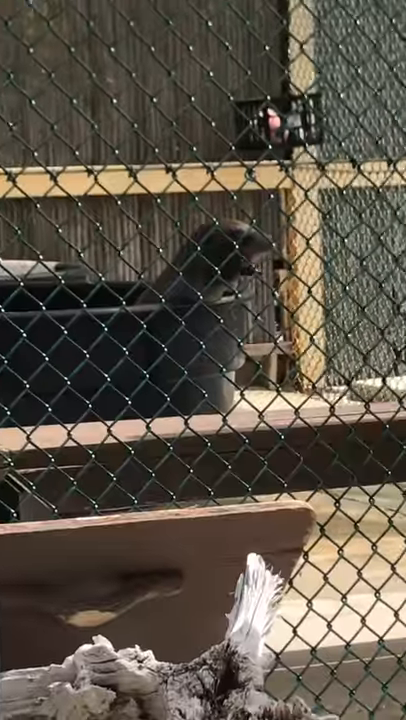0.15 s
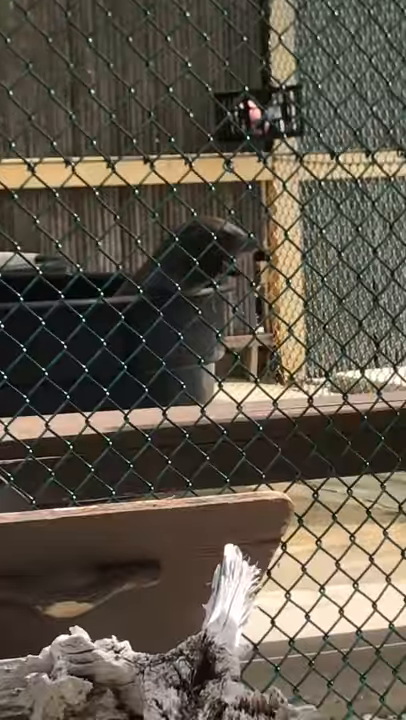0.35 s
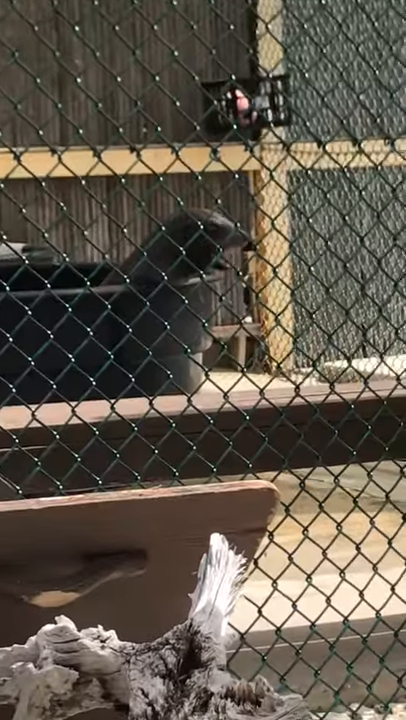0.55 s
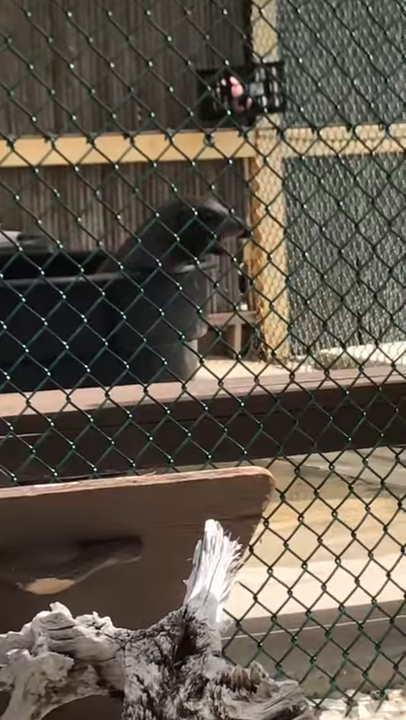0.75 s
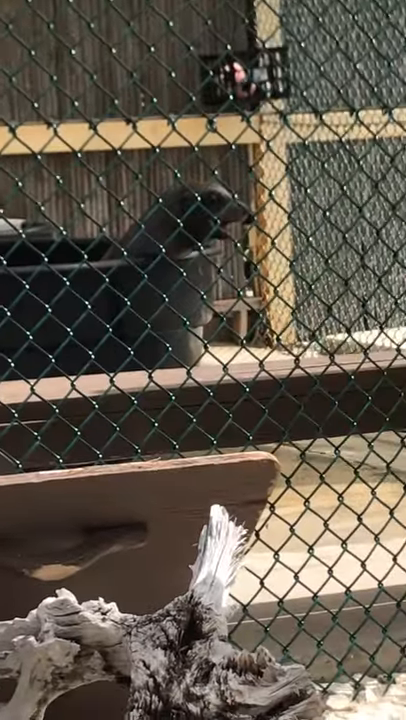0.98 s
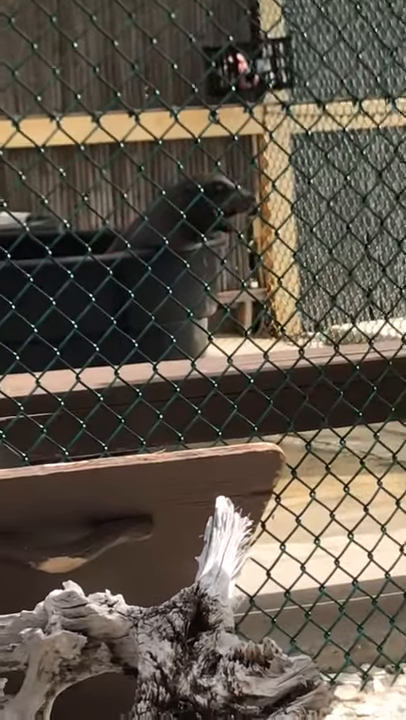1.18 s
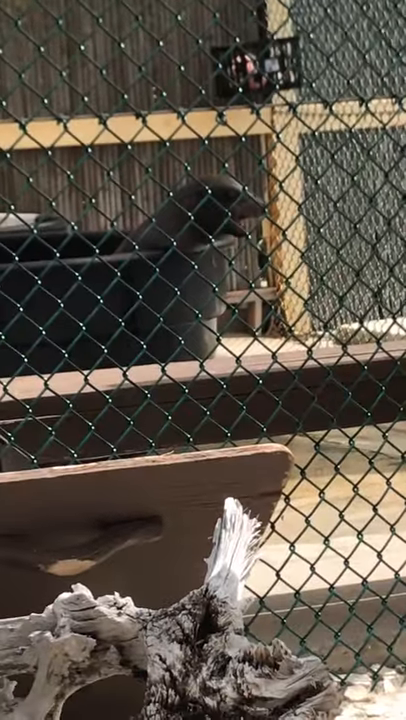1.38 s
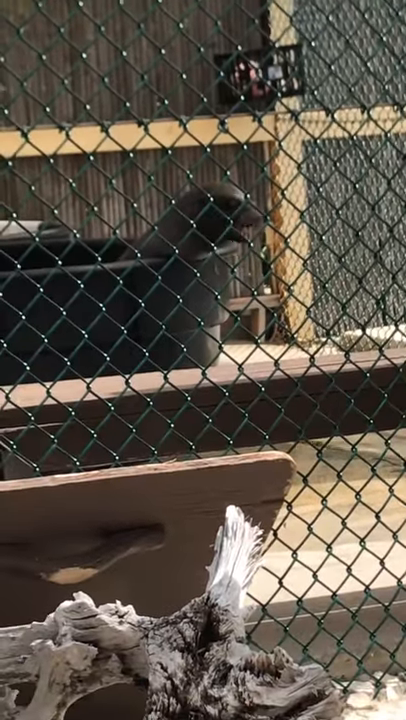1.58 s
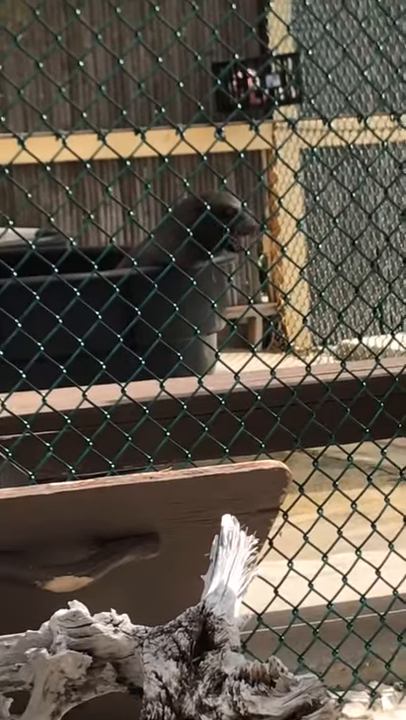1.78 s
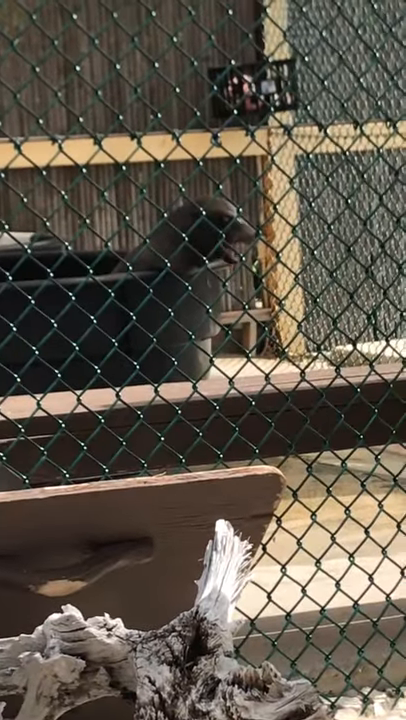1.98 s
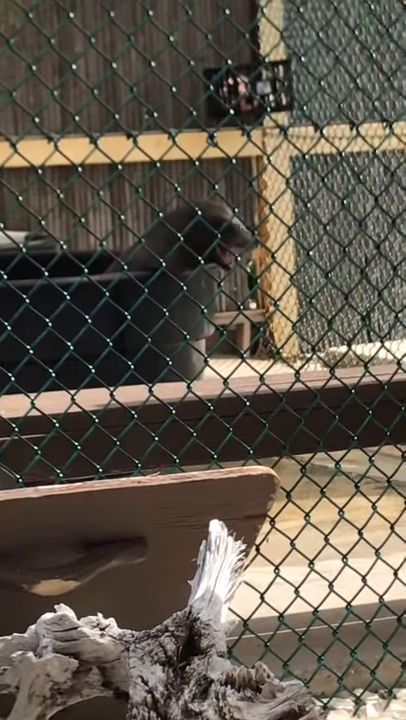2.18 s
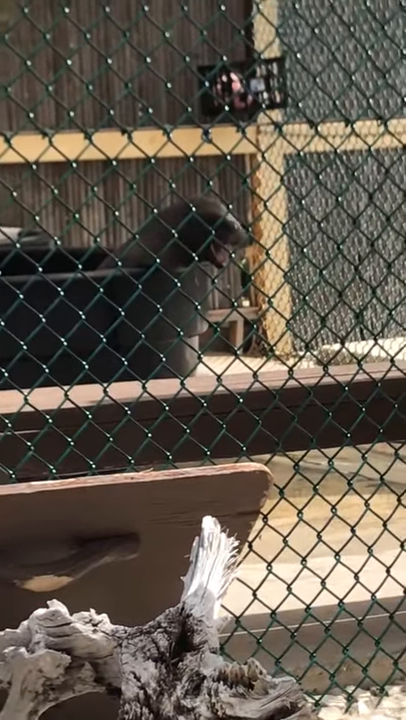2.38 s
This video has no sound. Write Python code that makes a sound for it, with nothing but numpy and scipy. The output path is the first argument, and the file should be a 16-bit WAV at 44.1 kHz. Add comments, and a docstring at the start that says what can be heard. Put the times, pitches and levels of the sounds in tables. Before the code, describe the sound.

A sea lion barks five times at an even pace, each bark harsh and nasal with a short echo from its outdoor pen. It is a few metres away, and low wind rumbles on the microphone.

```python
"""Sea lion in a wooden pen

A sea lion barks five times outdoors, a few metres away, and the pen throws back short echoes.
Vocal pulses and puffs of air pass through its throat: each bark starts as a rasp, locks into
a high nasal tone and breaks up into a growl. Wind rumbles and buffets on the microphone
over a faint outdoor wash, with two small ticks."""
import sys
import numpy as np
from scipy import signal
from scipy.fft import rfft, irfft, next_fast_len
from scipy.io import wavfile
from scipy.ndimage import uniform_filter1d

SR = 44100
rng = np.random.default_rng(int(sys.argv[2]) if len(sys.argv) > 2 else 0)


def put_to_file(sound):
    """Save the sound as 16-bit audio at rate SR, in the file named by the first command-line argument."""
    columns = np.atleast_2d(sound).T  # one column per channel
    safe = np.clip(columns, -1, 1)
    whole_steps = np.round(safe * 32767)
    wavfile.write(sys.argv[1], SR, whole_steps.astype(np.int16))


N = 108045


def amp(db):
    """Decibels to gain."""
    return 10 ** (np.asarray(db) / 20)


def unit(x):
    """Scales to rms 1."""
    return x / np.sqrt(np.mean(x ** 2) + 1e-20)


def steady(x, size):
    """Holds the level near rms 1 over stretches of size samples."""
    return x / np.sqrt(abs(uniform_filter1d(x ** 2, size)) + 1e-12)


def read(points, hz):
    """Reads a curve on a log-frequency axis."""
    f, value = np.transpose(points)
    return np.interp(np.log(hz + 1), np.log(f), value)


def add(mix, s, sound):
    """Mixes a sound in at s seconds."""
    part = mix[max(round(s * SR), 0):][:len(sound)]
    part += sound[:len(part)]


def colour(x, spectrum, lo=0, hi=SR):
    """Filters x by a spectrum, kept between lo and hi Hz, at rms 1."""
    hz = np.fft.rfftfreq(len(x), 1 / SR)
    return unit(irfft(rfft(x) * amp(read(spectrum, hz)) * (hz >= lo) * (hz < hi), len(x)))


def noise(spectrum):
    """Coloured noise as long as the scene."""
    return colour(rng.standard_normal(N), spectrum)


def wander(rate_hz):
    """Smooth random motion of rms 1, rolling off around rate_hz."""
    size = next_fast_len(N, real=True)
    hz = np.fft.rfftfreq(size, 1 / SR)
    return unit(irfft(rfft(rng.standard_normal(size)) * np.exp(-(hz / rate_hz) ** 2), size)[:N])


def strands(rate_hz, count):
    """Several half seconds of smooth random motion, one to a row."""
    motion = wander(rate_hz)
    return np.array([motion[at:at + SR // 2] for at in rng.integers(0, N - SR // 2, count)])


def gate(t, rise_s, fall_s):
    """Attack, hold, release."""
    return np.clip(t / rise_s, 0, 1) * np.clip((t[-1] - t) / fall_s, 0, 1)


def wind_rumble():
    """Wind on the microphone: a deep rumble that swells and sinks with the breeze."""
    # The rumble's colour. Each row: frequency in Hz, relative level in dB.
    spectrum = [(12, -50), (24, -30), (32, 6), (42, -8.5), (60, 4.5), (100, -2), (150, -6.5), (220, -19.5),
                (400, -39.5), (900, -58)]
    # The breeze. Each row: time in seconds, level in dB.
    breeze = [(0.01, -40), (0.04, -41.5), (0.16, -41.5), (0.26, -36), (0.28, -37), (0.45, -26.5),
              (0.52, -36.5), (0.55, -29), (0.58, -43), (0.65, -34), (0.73, -49.5), (0.86, -21), (0.88, -34),
              (0.93, -19.5), (1.0, -42), (1.05, -23), (1.13, -46), (1.25, -25), (1.27, -30.5),
              (1.32, -23.5), (1.42, -33), (1.48, -24.5), (1.62, -44.5), (1.67, -24.5), (1.73, -36.5),
              (1.78, -29), (2.07, -44.5), (2.15, -35), (2.17, -44.5), (2.44, -43)]
    level_db = np.interp(np.arange(N) / SR, *np.transpose(breeze))
    return steady(noise(spectrum), size=1600) * amp(level_db)


def outdoor_wash():
    """A faint, broad bed of noise that wavers slightly."""
    # The bed's colour. Each row: frequency in Hz, relative level in dB.
    spectrum = [(110, -48), (180, 0.5), (243, -1.5), (276, -5.5), (346, -5), (372, -9), (432, -9.5),
                (521, -6.5), (639, -9), (982, -6), (1430, -10), (1990, -13), (2450, -13.5), (6100, -19.5),
                (15500, -34)]
    level_db = -43.5 + 0.5 * wander(rate_hz=16)
    return amp(level_db) * noise(spectrum)


def bark(contour, voicing, tint):
    """Jittery vocal pulses and puffs of air pass the throat: rasp, then tone, then growl."""
    # The throat, mouth open for the tone. Each row: frequency in Hz, relative gain in dB.
    open_throat = [(250, -16), (520, -12), (670, -10), (850, -2), (1020, -5), (1200, -9), (1400, -0.5),
                   (1520, 1.5), (1670, 5), (1850, -1), (2130, -20), (2450, -5.5), (2750, -1), (3150, -13.5),
                   (3900, -17.5), (4500, -19.5), (5300, -23), (6300, -18.5), (7500, -24.5), (9000, -34),
                   (10300, -43.5), (11800, -36), (15500, -47)]
    # The throat, mouth closing for the last rasp. Each row: frequency in Hz, relative gain in dB.
    closing_throat = [(200, -42), (450, -52.5), (600, -16.5), (740, -7), (930, 8.5), (1100, -2.5),
                      (1260, -19), (1420, -0.5), (1730, -8.5), (2100, -14.5), (2450, -2.5), (2780, -3),
                      (3200, -11.5), (4200, -24), (6500, -30), (9000, -37), (15500, -46)]
    # A thin flare of air as the tone locks. Each row: frequency in Hz, relative level in dB.
    flare_spectrum = [(8000, -31), (10300, -12), (11600, -4), (13000, -4), (15800, -12)]
    attack_s, release_s, break_s, close_s = 0.002, 0.004, 0.05, 0.035
    subharmonic_db, shimmer_db, growl_db, spit_db = -19, 1.5, 2.6, 3.0
    flare_db, flare_delay_s, flare_width_s = -17.5, 0.011, 0.038

    times, *columns = np.transpose(contour)
    locks, breaks, core_rasp = voicing
    t = np.arange(0, times[-1] - times[0] + release_s, 1 / SR)
    n, now = len(t), t + times[0]
    pitch, low_db, high_db, hiss_db = (np.interp(now, times, column) for column in columns)
    rasp = np.interp(now, [times[0], locks, breaks, breaks + break_s], [.55, core_rasp, core_rasp, .76])
    closed = np.clip((now - breaks) / close_s, 0, 1)

    # Four bell curves tint the throat. Each: gain in dB, centre in Hz, width in Hz.
    chest_db, nasal_db, bite_db, air_db = tint
    bells = [(chest_db, 694, 200), (nasal_db, 1720, 137), (bite_db, 4270, 2000), (air_db, 11100, 1000)]
    f = np.geomspace(100, SR / 2, 400)
    tint_db = sum(db * np.exp(-((f - centre) / width) ** 2) for db, centre, width in bells)
    opened, closing = (np.c_[f, read(throat, f) + tint_db] for throat in (open_throat, closing_throat))

    # Strong and weak pulses alternate, which puts partials halfway between the harmonics.
    jitter = (.005 + .055 * rasp) * wander(rate_hz=300)[:n]
    cycles = np.cumsum(pitch * (1 + jitter)) / SR
    k = np.arange(2, 41)[:, None] / 2
    heights = amp(read(opened, k * pitch) + subharmonic_db * (k % 1 > 0))
    heights *= amp(shimmer_db * strands(rate_hz=70, count=len(k))[:, :n])
    # Above about the 11th harmonic the phases scatter and blur into rasp.
    blur = np.minimum((k / 11) ** 4, np.pi) * strands(rate_hz=220, count=len(k))[:, :n]
    throat_lag = 2.1 * np.log2(k) ** 2  # radians
    partials = heights * np.cos(2 * np.pi * k * cycles - throat_lag + blur)
    partial_hz = k[:, 0] * np.median(pitch)

    puffs = np.exp(-(cycles % 1) / 0.16) * rng.standard_normal(N)[:n]  # air escapes early in each cycle
    flutter = steady(amp(growl_db * np.sqrt(rasp) * wander(rate_hz=170)[:n]), size=600)
    spit = unit(amp(spit_db * wander(rate_hz=400)[:n]))
    flare = np.exp(-((now - locks - flare_delay_s) / flare_width_s) ** 2)
    out = amp(hiss_db.max() + flare_db + air_db) * flare * colour(puffs, flare_spectrum)

    # Higher bands are breathier. Each row: lower and upper edge in Hz, gain, air's share of the power.
    bands = [(0, 2100, amp(low_db), rasp),
             (2100, 5000, amp(high_db), 1 - (1 - rasp) ** 2),
             (5000, SR, amp(hiss_db) * spit, rasp + (1 - rasp) * .93)]
    for lo, hi, gain, air_share in bands:
        inside = (partial_hz >= lo) & (partial_hz < hi)
        tone = partials[inside].sum(0) / np.sqrt((heights[inside] ** 2).sum(0) / 2)
        air = (1 - closed) * colour(puffs, opened, lo, hi) + closed * colour(puffs, closing, lo, hi)
        out += gain * (np.sqrt(1 - air_share) * tone + np.sqrt(air_share) * steady(air, size=500))
    return out * flutter * gate(t, attack_s, release_s)


def sea_lion():
    """Five dry barks from one throat, each with its own contour, voicing and tint."""
    # One contour per bark. Each row: time in seconds, pitch in Hz, then the levels in dB
    # of the lower throat band, the upper throat band and the hiss.
    first = [(0.213, 604, -34.5, -40, -62), (0.231, 555.8, -27, -34, -65), (0.271, 551, -26.5, -33.5, -49),
             (0.291, 563, -32.5, -37, -47.5), (0.309, 613.2, -31.5, -38, -49),
             (0.331, 586.7, -33, -39.5, -47), (0.367, 611, -31.5, -43, -56), (0.385, 612, -28, -41, -50)]
    second = [(0.605, 598, -44, -39.5, -61), (0.617, 568, -24.5, -28, -47), (0.637, 508, -20.5, -39, -43),
              (0.661, 500.4, -20, -35, -43.5), (0.683, 524.8, -17.5, -25, -37),
              (0.719, 557.7, -25.5, -26, -44), (0.725, 563.7, -23.5, -42, -46),
              (0.755, 488, -25.5, -32.5, -55), (0.777, 478, -33, -39, -55), (0.8, 486, -34, -56, -70)]
    third = [(1.068, 629, -33, -43, -67), (1.08, 646.7, -29.5, -22.5, -54),
             (1.132, 578.5, -25.5, -31.5, -39), (1.146, 653, -25.5, -24, -44),
             (1.176, 669, -27.5, -26, -41.5), (1.208, 658.2, -28, -27, -48), (1.228, 644, -33.5, -42, -50),
             (1.26, 555.7, -29, -32, -52), (1.294, 576.6, -36.5, -45, -66), (1.32, 528, -39, -48, -62)]
    fourth = [(1.588, 582.7, -34.5, -40, -65), (1.61, 609, -25, -25.5, -47.5),
              (1.624, 684, -27.5, -21.5, -56), (1.646, 695.2, -23.5, -29.5, -47.5),
              (1.692, 687.5, -26, -22, -52), (1.714, 696.3, -27.5, -46, -50), (1.724, 697, -36.5, -29, -54),
              (1.75, 647, -44, -55, -72)]
    fifth = [(2.0, 643, -37, -51, -61), (2.012, 633.7, -26.5, -22, -50), (2.028, 617.6, -26, -32, -45.5),
             (2.05, 557.3, -19.5, -24.5, -35.5), (2.086, 560.2, -18, -20, -38),
             (2.114, 552.9, -20, -21.5, -34), (2.14, 571, -21, -28, -35), (2.18, 575.7, -32, -33.5, -46),
             (2.196, 548, -29.5, -36.5, -49), (2.23, 558, -42, -38.5, -55)]
    # Each bark's tonal core. Each row: when the tone locks and when it breaks in seconds,
    # then the rasp's share of the lower band's power in between, from 0 to 1.
    voicings = [(.235, .285, .17), (.63, .725, .025), (1.085, 1.21, .1), (1.62, 1.69, .27),
                (2.05, 2.14, .02)]
    # Each bark's tint. Each row: chest, nasal, bite and air boost or cut in dB.
    tints = [(1, -7, -1, 1.5), (3.5, -3, -2, 1), (4, 3, -10, 2), (-4.5, -3.5, 3, 7.5),
             (-1.5, -1.5, 5, -6.5)]
    out = np.zeros(N)
    for contour, voicing, tint in zip((first, second, third, fourth, fifth), voicings, tints):
        add(out, contour[0][0], bark(contour, voicing, tint))
    return out


def pen(voice):
    """Deck and walls return a few echoes, a short tail and one faint lingering note."""
    # First reflections. Each row: delay in seconds, gain in dB.
    echoes = [(.0043, -7.5), (.0112, -41.5), (.019, -8.5)]
    # The tail's decay. Each row: frequency in Hz, seconds to fall by 60 dB.
    decay = [(300, 0.48), (1000, 0.27), (2000, 0.45), (5000, 0.11), (14000, 0.25)]
    direct_s, direct_db, tail_db, build_s = 0.0015, 0.33, -15.5, .015
    ring_hz, ring_t60_s, ring_db = 998, .7, -64.5
    hz, frame_s, bins = signal.stft(rng.standard_normal(SR), SR, nperseg=256)
    bins *= amp(-60 * frame_s / read(decay, hz)[:, None])
    tail = signal.istft(bins, SR, nperseg=256)[1]
    t = np.arange(len(tail)) / SR
    tail *= np.minimum(t / build_s, 1)
    ring = amp(ring_db - 60 * t / ring_t60_s) * np.sin(2 * np.pi * ring_hz * t)
    response = amp(tail_db) * tail / np.linalg.norm(tail) + ring
    for delay, db in [(direct_s, direct_db), *echoes]:
        add(response, delay, amp([db]))
    return signal.fftconvolve(voice, response)[:N]


def wind_buffets():
    """Wind hits the microphone in short bursts, brighter than the rumble."""
    # The hits. Each row: start in seconds, length in seconds, level in dB.
    hits = [(.355, 0.019, -32.5), (0.832, 0.016, -37.5), (0.902, 0.11, -38.5), (0.992, 0.047, -24),
            (1.036, 0.0315, -22), (1.29, 0.04, -26.5), (1.339, 0.025, -27.5), (1.469, 0.051, -26.5)]
    # A buffet's colour. Each row: frequency in Hz, relative level in dB.
    spectrum = [(15, -45), (40, -12), (90, -3.5), (160, -5), (300, -8), (480, -19), (700, -29), (1500, -44),
                (4000, -75)]
    out = np.zeros(N)
    for start, length, db in hits:
        t = np.arange(0, length, 1 / SR)
        burst = unit(noise(spectrum)[:len(t)])
        add(out, start, amp(db) * burst * gate(t, rise_s=0.0049, fall_s=0.0049))
    return out


def ticks():
    """Two small ticks of bright, fast-dying noise."""
    # The ticks. Each row: start in seconds, level in dB.
    hits = [(.4, -44), (1.819, -41)]
    # A tick's colour. Each row: frequency in Hz, relative level in dB.
    spectrum = [(1000, -20), (3500, 4), (6500, 13), (10000, 5), (15000, -7)]
    decay_s = 0.009
    t = np.arange(SR // 20) / SR
    out = np.zeros(N)
    for start, db in hits:
        add(out, start, amp(db) * noise(spectrum)[:len(t)] * np.exp(-t / decay_s))
    return out


def scene():
    """The barks in their pen, mixed in mono with wind, wash and ticks."""
    return (pen(sea_lion()) + wind_rumble() + wind_buffets() + outdoor_wash() + ticks())[None]


def record(dry):
    """A low cut trims the deepest rumble and a steep low-pass takes off the very top."""
    low_cut_hz, top_hz = 36, 15830
    low_cut = signal.butter(4, low_cut_hz, "highpass", fs=SR, output="sos")
    low_pass = signal.firwin(1023, top_hz, window=("kaiser", 9), fs=SR)
    return signal.oaconvolve(signal.sosfilt(low_cut, dry), low_pass[None], "same")


dry = scene()
out = record(dry)
put_to_file(out)
```